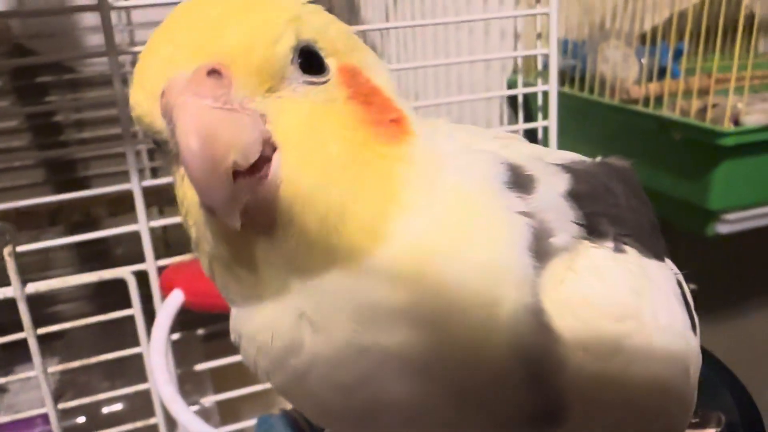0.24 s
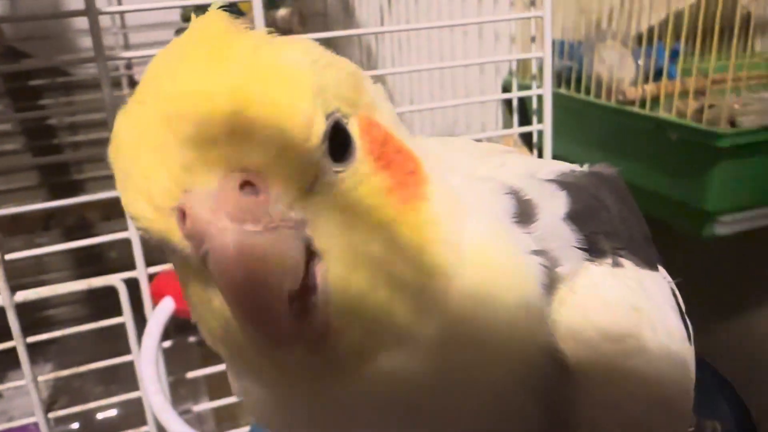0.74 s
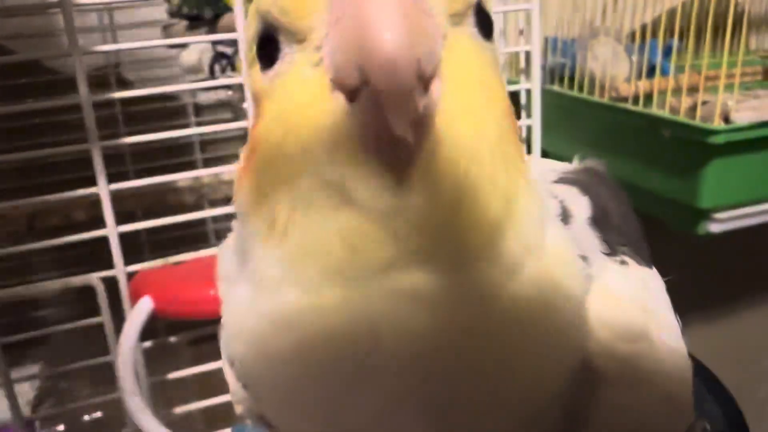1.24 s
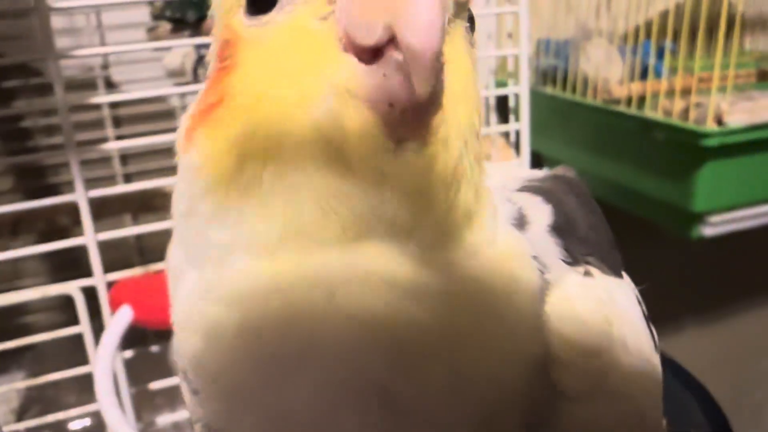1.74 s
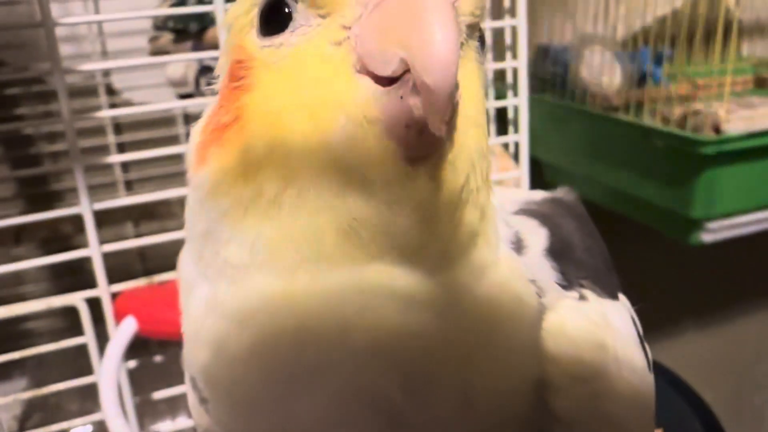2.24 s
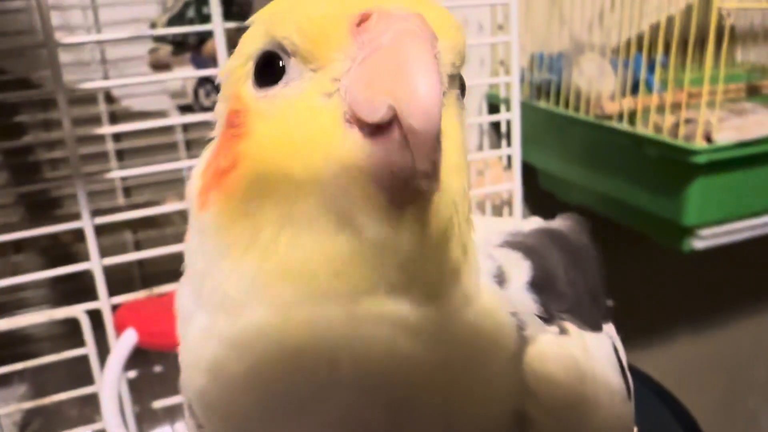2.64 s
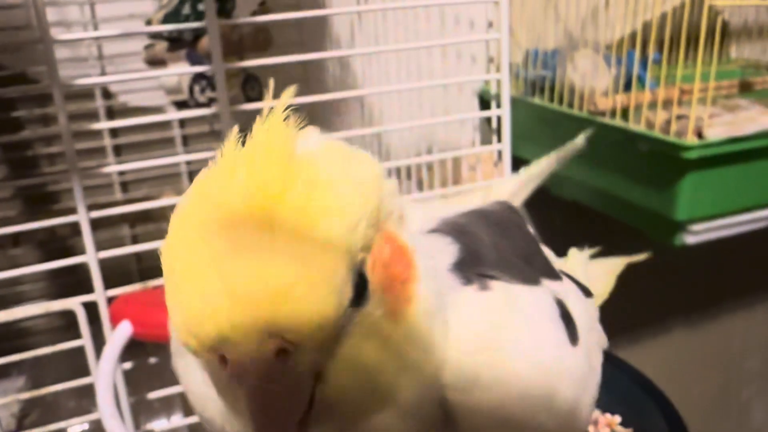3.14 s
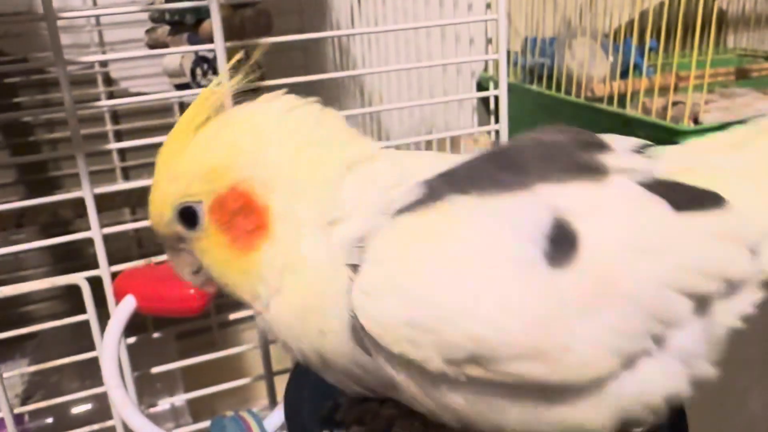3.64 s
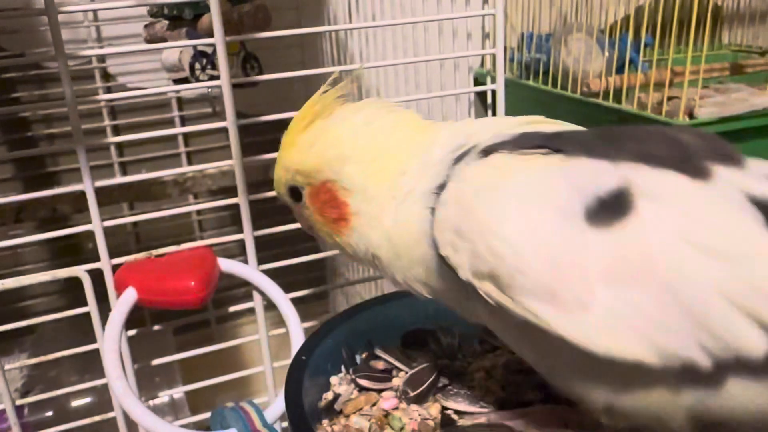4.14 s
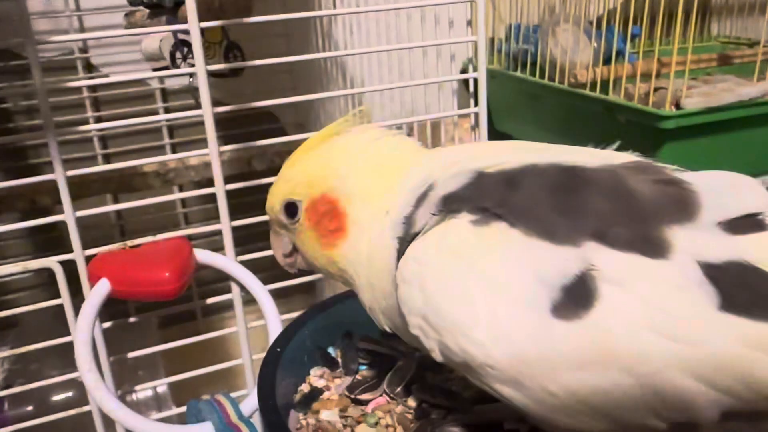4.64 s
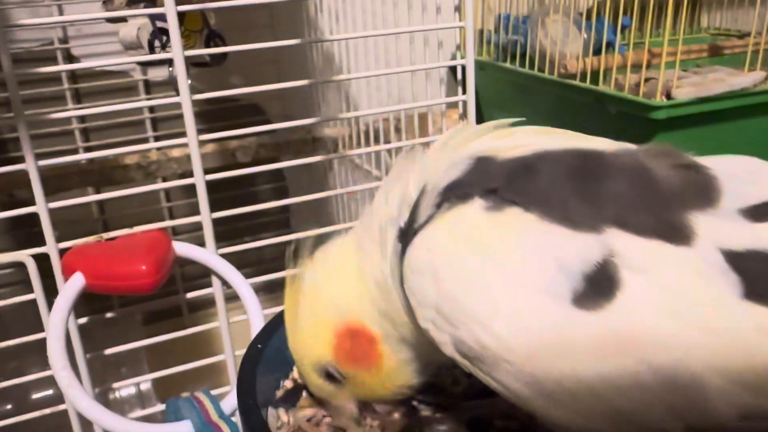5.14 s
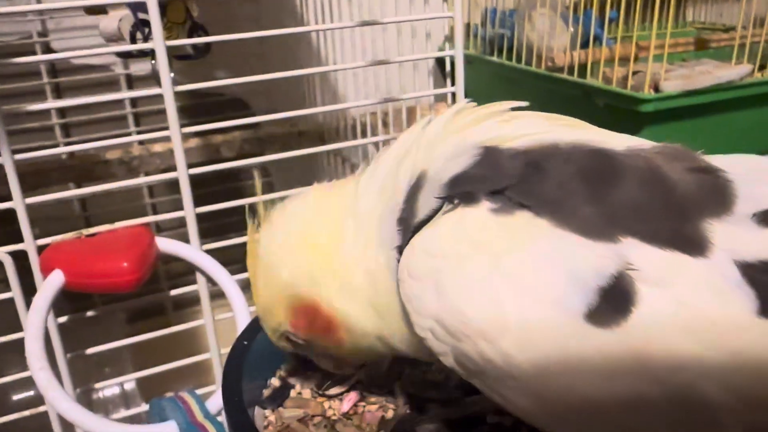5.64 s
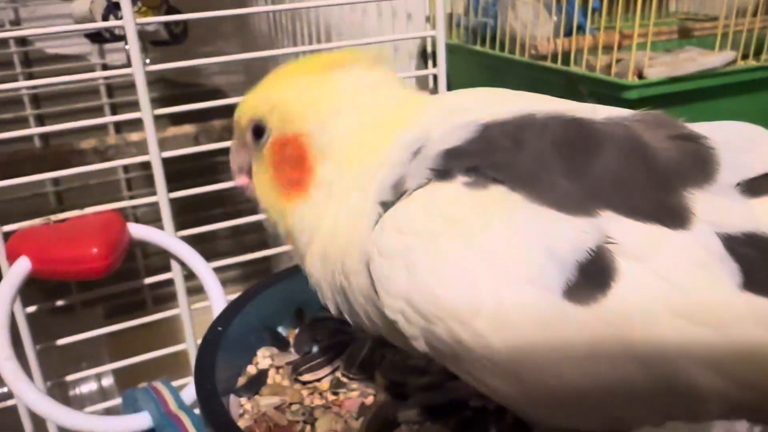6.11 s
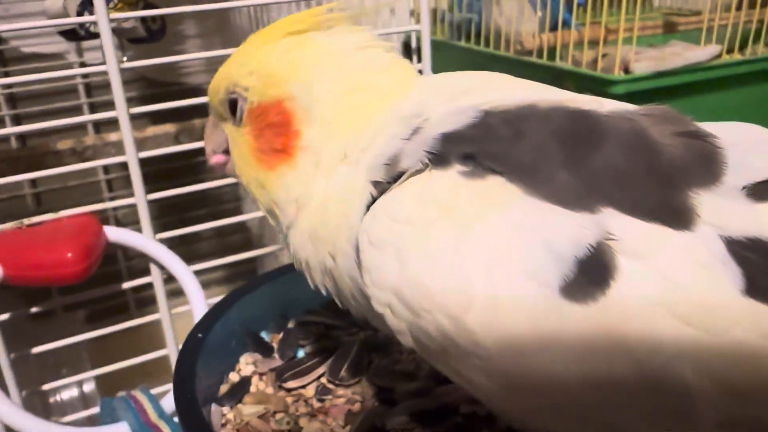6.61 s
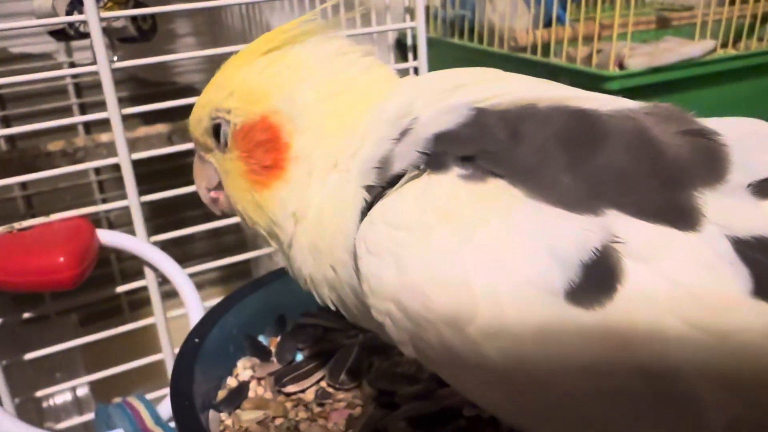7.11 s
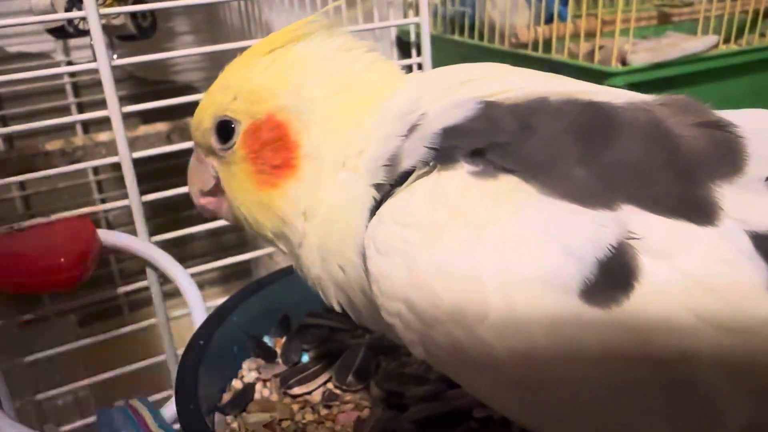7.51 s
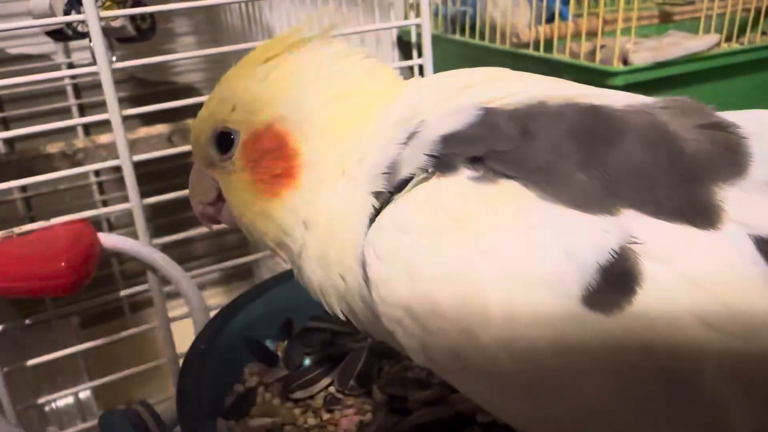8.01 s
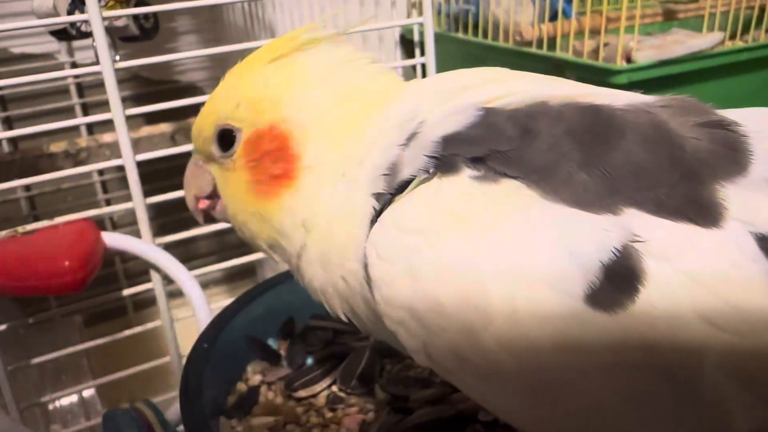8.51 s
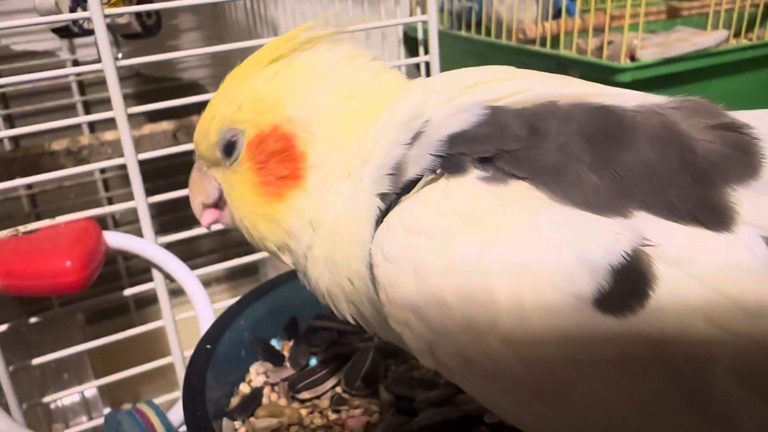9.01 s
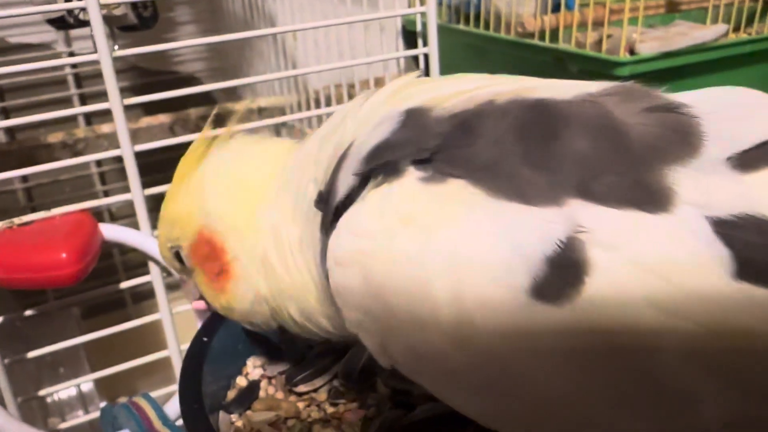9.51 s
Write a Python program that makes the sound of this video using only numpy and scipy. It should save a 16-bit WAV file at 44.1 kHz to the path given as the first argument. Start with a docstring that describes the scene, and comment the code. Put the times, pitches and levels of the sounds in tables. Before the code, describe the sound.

A cockatiel feeds at a bowl in an indoor cage: dry crackling husks and bright, tiny clicks close by. A nearby bird repeats warbling whistles that climb, flip to a high crest and drop, ringing briefly off the walls from the left. Low rumble and knocks from a hand on the microphone sit mostly near the start, with a heavy one later, over quiet room noise.

```python
"""Quiet room tone, faint hum, plumage hiss and the dull rumble of a hand on the recorder open the scene.
A cockatiel feeds at a seed bowl in a cage: the beak ticks and husks crunch, as short noise and impulse bursts.
A pet bird nearby peeps, then repeats arched, warbling chirps: gliding harmonic tones with hoarse moments.
The chirps ring round a small, live room, modelled as decaying noise reflections; knocks are swelling sines."""
import sys
import numpy as np
from scipy import signal
from scipy.fft import rfft, irfft
from scipy.io import wavfile

SR = 44100
rng = np.random.default_rng(int(sys.argv[2]) if len(sys.argv) > 2 else 0)


def digitize_waveform(pressure):
    """Quantize a signal to 16-bit integers and store it at the path in sys.argv[1].

    Rows of a 2-D input are taken as channels; values are limited to [-1, 1].
    """
    field = np.atleast_2d(pressure).T
    bounded = np.clip(field, -1, 1)
    quanta = np.round(bounded * 32767).astype(np.int16)
    wavfile.write(sys.argv[1], SR, quanta)


N = 430416
TIME = np.arange(N) / SR

# How the calling bird faces and strains. Each row: time in seconds, straight-path sound against the
# room in dB, hoarseness 0-1.
CALLER = [(1.7, -22, 0.35), (2.55, -15, 0.55), (3.0, -13, 0.92), (3.25, -4, 0), (3.7, -6.5, 0.32),
          (4.15, -7.5, 0.35), (4.5, -7.5, 0), (5.5, -25, 0.62), (5.85, -11, 0.25), (6.4, -1.5, 0.34),
          (6.7, -11.5, 0.88), (7.3, -9, 0.76), (9.0, -6, 0.31)]


def from_db(db):
    """Decibels to gain."""
    return 10 ** (np.asarray(db) / 20)


def rms_one(x):
    """Scale to unit power."""
    return x / np.sqrt(np.mean(x ** 2) + 1e-20)


def along(rows, t):
    """The columns of a curve, interpolated at times t."""
    s, *columns = np.transpose(rows)
    return [np.interp(t, s, c) for c in columns]


def at_hz(points, hz):
    """Read a table on a log-frequency axis."""
    f, value = np.transpose(points)
    return np.interp(np.log(np.maximum(hz, 1)), np.log(f), value)


def band(x, low_hz, high_hz, order=2):
    """Causal band-pass."""
    high_hz = min(high_hz, SR / 2 - 500)
    return signal.sosfilt(signal.butter(order, [low_hz, high_hz], "band", fs=SR, output="sos"), x)


def flutter(count, rate_hz):
    """Random wobble round a rate; spread 1."""
    run_in = SR // 10
    return rms_one(band(rng.standard_normal(count + run_in), rate_hz / 2, rate_hz * 2)[run_in:])


def add(track, s, sound):
    """Mix a sound in at time s."""
    i = max(round(s * SR), 0)
    track[i:i + len(sound)] += sound[:N - i]


def stereo_noise(spectrum):
    """Coloured noise whose left-right likeness depends on frequency; rms 1."""
    # Each row: frequency in Hz, left-right likeness 0-1.
    likeness = [(50, 1), (250, 0.21), (600, 0.25), (1500, 0.26), (8000, 0), (15000, 1)]
    hz = np.arange(N // 2 + 1) * SR / N
    mid, side = rfft(rng.standard_normal((2, N))) * from_db(at_hz(spectrum, hz))
    alike = np.clip(at_hz(likeness, hz), -1, 1)
    return rms_one(irfft(np.sqrt(1 + alike) * mid + np.sqrt(1 - alike) * side * [[1], [-1]], N))


def room(x, gap_s=0.0013, build_s=0.0007):
    """Dense wall reflections, different at each ear, decaying at a rate set per band."""
    # Reverberation time. Each row: frequency in Hz, time to fall 60 dB in seconds.
    t60_s = [(500, 0.9), (2500, 0.34), (5000, 0.37), (9000, 0.21), (16000, 0.024)]
    t = np.arange(SR // 2) / SR
    edges_hz = np.geomspace(300, 19000, 8)
    echoes = np.zeros((2, len(t)))
    for low_hz, high_hz in zip(edges_hz, edges_hz[1:]):
        decay_db = -60 * t / at_hz(t60_s, np.sqrt(low_hz * high_hz))
        echoes += band(rng.standard_normal((2, len(t))), low_hz, high_hz) * from_db(decay_db)
    echoes *= np.clip((t - gap_s) / build_s, 0, 1)
    gain = np.sqrt(np.mean(np.abs(rfft(echoes)[:, 1000:2500]) ** 2))   # 2-5 kHz: bins are 2 Hz wide
    return signal.fftconvolve(x[None], echoes / gain, axes=1)[:, :N]


def leftward(pair, left_db, low_hz=1900, high_hz=6500):
    """A source on the left is louder there, mostly in the presence range."""
    presence = band(pair, low_hz, high_hz, order=1)
    return pair + presence * (from_db([[left_db], [-left_db]]) - 1)


def room_tone():
    """Quiet stereo background noise of slowly changing level."""
    # Spectrum. Each row: frequency in Hz, relative level in dB.
    tone_spectrum = [(25, -26), (60, -9), (110, -10), (200, 0), (380, -4), (730, -11), (1120, -17),
                     (1810, -21), (4240, -31), (8000, -35), (9700, -36), (11500, -45), (16000, -48)]
    # Each row: time in seconds, level in dB.
    tone_level = [(0, -43), (2.2, -44), (3.3, -47), (5.2, -49), (7, -45), (8.1, -45), (9, -46.5),
                  (9.7, -44)]
    return from_db(along(tone_level, TIME)[0]) * stereo_noise(tone_spectrum)


def hum(wander_hz=1.5):
    """Faint, slightly unsteady appliance tones, as narrow bands of noise."""
    # Each row: frequency in Hz, level in dB.
    hum_tones = [(207, -65.5), (402, -61.5)]
    out = np.zeros(N)
    for hz, db in hum_tones:
        tone = band(rng.standard_normal(N), hz - wander_hz, hz + wander_hz, order=1)
        out += from_db(db) * rms_one(tone)
    return out


def feathers(flicker_db=3.0, flicker_hz=7):
    """Soft uneven hiss of plumage as the bird moves its head, close to the microphone."""
    # Each row: time in seconds, level in dB before flicker.
    rustle = [(0, -60.5), (.8, -55.5), (1.1, -56.5), (1.6, -55), (2.3, -59.5), (3.0, -59), (4.0, -75),
              (9.7, -87)]
    # Spectrum. Each row: frequency in Hz, relative level in dB.
    plumage_spectrum = [(500, -21.5), (2000, 4), (7000, 3.5), (10000, -0.5), (12000, -9), (16000, -3.5)]
    level_db = along(rustle, TIME)[0] + flicker_db * flutter(N, flicker_hz)
    return from_db(level_db) * stereo_noise(plumage_spectrum)


def handling(rumble_db=-2.0, rubbing_db=1.5):
    """The grip shifts: deep rumble, rubbing when it slips, and knocks that swell and die in a few cycles."""
    # Grip shifts. Each row: start in seconds, length in seconds, relative deep rumble in dB,
    # relative rubbing in dB.
    grips = [(0.027, 0.79, -40, -60), (0.813, .06, -35, -38.5), (0.892, 0.051, -18.5, -26.5),
             (0.974, 0.36, -35, -49.5), (1.406, .13, -17, -26.5), (1.583, 0.04, -18, -28),
             (1.692, 0.12, -23, -23.5), (1.908, 0.022, -29.5, -40.5), (2.473, 0.065, -28, -27.5),
             (2.57, .2, -36, -46.5), (3.55, 0.87, -61, -79.5), (4.21, 0.7, -44.5, -60.5),
             (5.036, 0.12, -35.5, -55.5), (5.25, 2.8, -57, -79.5), (7.082, .33, -42.5, -57),
             (7.442, 0.053, -20, -29), (7.528, 0.25, -28, -54), (7.859, 0.058, -18.5, -29.5),
             (8.75, 0.71, -59.5, -72), (9.493, .26, -49.5, -69)]
    # Knocks on the recorder body. Each row: start in seconds, sine peak in dB, pitch in Hz,
    # swell time in seconds, scuff against the sine in dB.
    knock_rows = [(0.905, -16, 85, 0.008, -35), (1.459, -20, 363, 0.0036, -32),
                  (1.707, -12, 290, 0.0038, -17), (1.744, -9.5, 278, 0.0036, -5.5),
                  (7.453, -4, 260, 0.0029, -26), (7.85, -14.5, 73, 0.014, -39),
                  (7.886, -20.5, 170.3, 0.0068, -36)]
    # Spectra. Each row: frequency in Hz, relative level in dB.
    rumble_spectrum = [(15, -14), (30, -29), (45, 4), (75, -1.5), (120, -8.5), (200, -26.5), (400, -63),
                       (1000, -100)]
    rubbing_spectrum = [(40, -31), (90, 8.5), (150, 6), (260, -1), (400, -7), (700, -23), (1400, -36),
                        (4000, -75)]
    attack_s, release_s = 0.014, 0.026   # time constants of each shift
    deep, rub, knocks = np.zeros(N), np.zeros(N), np.zeros(N)
    for s, length_s, deep_db, rub_db in grips:
        outside = np.maximum((s - TIME) / attack_s, (TIME - s - length_s) / release_s)
        pressure = np.exp(-np.clip(outside, 0, 20))
        deep = np.maximum(deep, pressure * from_db(deep_db + rumble_db))
        rub = np.maximum(rub, pressure * from_db(rub_db))
    t = np.arange(SR // 5) / SR
    for s, peak_db, hz, swell_s, scuff_db in knock_rows:
        scuff = band(band(rng.standard_normal(len(t)), 487, 522, order=1), 440, 2700)
        envelope = (t / swell_s * np.exp(1 - t / swell_s)) ** 2
        body = np.sin(2 * np.pi * hz * t) + from_db(scuff_db) * rms_one(scuff)
        add(knocks, s, from_db(peak_db) * envelope * body)
    rubbing = from_db(rubbing_db) * rub * stereo_noise(rubbing_spectrum)
    return deep * stereo_noise(rumble_spectrum) + rubbing + knocks


def beak_ticks(decay_s=0.0011, room_db=4.5, nibbles_per_s=4, nibble_db=-51):
    """Sharp bright contacts of beak on seed, with faint nibbles at random times among them."""
    # Each row: start in seconds, dry peak in dB.
    ticks = [(3.8024, -34), (4.6855, -22.5), (4.79, -31), (5.0946, -37), (6.3776, -44), (6.576, -30.5),
             (8.1782, -27), (8.4427, -29.5)]
    out, t = np.zeros(N), np.arange(SR // 100) / SR
    draws = rng.random((int(nibbles_per_s * N / SR), 2))
    nibbles = [(u * N / SR, nibble_db - 10 * v) for u, v in draws]
    for s, peak_db in list(ticks) + nibbles:
        tick = band(rng.standard_normal(len(t)) * np.exp(-t / decay_s), 3500, 17000, order=1)
        add(out, s, from_db(peak_db) * tick / np.abs(tick).max())
    return out + from_db(room_db) * room(out)


def peep(s, length_s, start_hz, end_hz, level_db, overtones_db):
    """A straight glide at an even level, as (s, pitch Hz, fundamental dB, overtones dB)."""
    return [(s, start_hz, level_db, overtones_db), (s + length_s, end_hz, level_db, overtones_db)]


def arched_call(s, climb_s, crest_s, fall_s, start_hz, flip_hz, top_hz, end_hz,
                climb_db, crest_db, overtones_db, crest_overtones_db):
    """Climb, register flip to a crest, and fall, as (s, pitch Hz, fundamental dB, overtones dB)."""
    flip_s = .006         # time to change register
    sag_per_s = .85       # share by which the crest's ends lie under its top, per s of crest
    swell_s, swell_db = .04, 5       # the whistle swells at the start
    bite_s, bite_db = 0.027, 17      # the overtones come in sooner
    mellow_db = 6.5                  # overtones fade during the climb
    full_voice_hz, weak_db_per_hz = 2200, .019   # weaker the further under this pitch
    # the fall starts a little under the flip pitch and is softer than the climb
    fall_pitch, fall_db, fall_overtones_db = .95, 5, 9.5

    def whistle_db(hz):
        """The whistle weakens below full-voice pitch."""
        return climb_db - weak_db_per_hz * np.maximum(full_voice_hz - hz, 0)

    u = np.linspace(0, 1, 20)
    rising_hz = start_hz + (flip_hz - start_hz) * u
    arch_hz = top_hz * (1 - sag_per_s * crest_s * (2 * u - 1) ** 2)
    falling_hz = fall_pitch * flip_hz * (1 - u) + end_hz * u
    rising_db = whistle_db(rising_hz) - swell_db * np.maximum(1 - u * climb_s / swell_s, 0)
    biting_db = overtones_db - bite_db * np.maximum(1 - u * climb_s / bite_s, 0) - mellow_db * u
    climb = [s + climb_s * u, rising_hz, rising_db, biting_db]
    crest = [s + climb_s + flip_s + (crest_s - 2 * flip_s) * u, arch_hz,
             np.full_like(u, crest_db), np.full_like(u, crest_overtones_db)]
    fall = [s + climb_s + crest_s + fall_s * u, falling_hz,
            whistle_db(falling_hz) - fall_db, np.full_like(u, overtones_db - fall_overtones_db)]
    return np.hstack([climb, crest, fall]).T


def chirp(rows, treble_db, uneven_db=3.5, uneven_hz=25, attack_s=.008, release_s=0.015,
          warble_hz=56, rasp_hz=200, shimmer_db=2.5, crest_hz=3100, crest_calm=0.64,
          wheeze_db=-6.0, second_hz=2400, second_db=-9.5, sheen_db=-26.5):
    """The syrinx follows a pitch curve, warbling at low pitch and steadying at the crest."""
    # Overtones above the octave. Each row: frequency in Hz, relative strength in dB.
    throat_points = [(4000, -9), (5800, -8.5), (7500, -18), (9800, -18), (11500, -30.5), (13500, -31),
                     (16000, -26.5)]

    def throat_db(f):
        """Throat colour, with this call's own brightness coming in from 10 to 12 kHz."""
        return at_hz(throat_points, f) + treble_db * np.clip((f - 10000) / 2000, 0, 1)

    t = np.arange(rows[0][0] - attack_s, rows[-1][0] + release_s, 1 / SR)
    count = len(t)
    hz, fundamental_db, overtones_db = along(rows, t)
    hoarse = np.clip(along(CALLER, t)[1], 0, 1)
    high = np.clip((hz - crest_hz) / 400 + 1, 0, 1)
    calm = crest_calm * high
    # the warble is a chain of small, uneven arches
    arch_rate_hz = warble_hz * (1 + .25 * flutter(count, 30))
    arches = np.abs(np.sin(np.pi * np.cumsum(arch_rate_hz) / SR)) - 2 / np.pi
    warble = .075 * arches + .011 * flutter(count, 35)
    # hoarse catches only pull the pitch down, so the top edge of the call stays clean
    catches = .14 * hoarse ** 2 * np.maximum(flutter(count, rasp_hz) - .7, 0)
    hz = hz * (1 + (1 - calm) * warble - catches)
    phase = 2 * np.pi * np.cumsum(hz) / SR
    upper = np.zeros(count)
    for k in range(3, 9):
        strength = from_db(throat_db(k * hz) + uneven_db * flutter(count, uneven_hz))
        upper += strength * (k * hz < SR / 2) * np.sin(k * phase)
    # a strained crest splits off a second, lower and wobblier tone
    second_phase = 2 * np.pi * np.cumsum(second_hz * (1 + .08 * flutter(count, 90))) / SR
    second = from_db(second_db) * hoarse * high * np.sin(second_phase)
    # turbulence roughens the overtones of a hoarse call
    air = band(rng.standard_normal(count), 4200, 20000)
    wheeze = rms_one(irfft(rfft(air) * from_db(throat_db(np.fft.rfftfreq(count, 1 / SR))), count))
    overtones = np.sin(2 * phase) + upper + from_db(wheeze_db) * hoarse * wheeze
    voice = from_db(fundamental_db) * (np.sin(phase) + second) + from_db(overtones_db) * overtones
    # the highest harmonics follow the strength of the whistle itself
    harmonics = sum((k * hz < SR / 2) * np.sin(k * phase) for k in range(4, 9))
    sheen = band(harmonics, 12500, 16500)
    voice = voice + from_db(fundamental_db + sheen_db + treble_db) * sheen
    gate = np.clip(np.minimum((t - t[0]) / attack_s, (t[-1] - t) / release_s), 0, 1)
    shimmer = shimmer_db * (1 - calm * (1.5 - hoarse)) * flutter(count, warble_hz)
    return t[0], np.sqrt(2) * voice * gate * from_db(shimmer)


def calling_bird(left_db=8.5, room_left_db=1.0, focus_hz=3130, focus_width_hz=220, focus_db=-1.5):
    """Calls arrive mostly by the walls, and straight from the left when the bird faces this way."""
    # Soft peeps. Each row: start in seconds, length in seconds, start pitch in Hz, end pitch in Hz,
    # relative level in dB, relative overtones in dB.
    peeps = [(0.443, 0.038, 2195, 1770, -52.5, -72), (5.045, 0.16, 1392, 1366, -59, -65),
             (5.25, .06, 1408, 1544, -58.5, -61), (6.311, 0.036, 2200, 1800, -50.5, -71),
             (6.367, 0.04, 1790, 3080, -50.5, -77), (7.442, .055, 1548, 2127, -48, -47),
             (7.511, 0.025, 2950, 2590, -40, -45.5), (8.144, 0.053, 1592, 1440, -51, -53),
             (8.197, 0.054, 1640, 2005, -47.5, -61), (8.277, 0.0056, 3386, 2930, -39, -54),
             (8.301, .014, 3320, 2390, -39, -54), (8.924, 0.023, 1360, 1550, -51, -52),
             (8.968, .07, 1496, 1728, -49.5, -59), (9.075, 0.042, 1627, 1650, -51, -55.5),
             (9.171, 0.023, 2400, 3190, -42.5, -37.5)]
    # Arched chirps; pitches before warble. Each row: start in seconds, climb in seconds, crest in
    # seconds, fall in seconds, start pitch in Hz, flip pitch in Hz, top pitch in Hz, end pitch in Hz,
    # relative levels in dB of climb, crest, climb overtones and crest overtones, top treble in dB.
    chirps = [(1.61, 0.085, 0.15, 0.036, 1604, 2546, 3418, 2450, -24, -21.5, -36.5, -51, 0.5),
              (2.405, 0.11, 0.069, 0.055, 1660, 2702, 3320, 2025, -20, -24.5, -30.5, -41, -13),
              (2.81, 0.072, 0.18, 0.0051, 1635, 2507, 3577, 2380, -19.5, -23, -28, -31.5, 4),
              (3.189, 0.11, 0.061, 0.059, 1910, 2774, 3210, 2254, -21, -19.5, -19.5, -38.5, 0),
              (3.55, 0.099, 0.064, 0.064, 1755, 2780, 3163, 2192, -22.5, -17.5, -21, -40, 4),
              (4.00, 0.13, 0.061, 0.067, 1658, 2472, 2930, 2087, -22, -20, -24, -39, 6),
              (4.39, .120, 0.092, 0.041, 1773, 2323, 2680, 1857, -25.5, -27.5, -24.5, -33.5, -6),
              (5.324, 0.12, .066, .046, 1693, 2910, 3304, 2237, -27, -22.5, -36.5, -44, 4),
              (5.71, 0.099, 0.081, 0.03, 1518, 2054, 2330, 1900, -20.5, -20, -32, -36, -25),
              (6.589, 0.061, 0.17, 0.018, 1600, 2442, 3452, 2394, -27.5, -26.5, -41, -43, -1),
              (7.10, 0.084, 0.14, 0.01, 1653, 2550, 3396, 2390, -28, -24.3, -36, -48, -3)]
    voice = np.zeros(N)
    for row in peeps:
        add(voice, *chirp(peep(*row), 0))
    for *shape, treble_db in chirps:
        add(voice, *chirp(arched_call(*shape), treble_db))
    straight = from_db(along(CALLER, TIME)[0])
    voice = voice / np.sqrt(1 + straight ** 2)   # direct and room shares keep the total power
    direct = voice * straight
    # near reflections reinforce one narrow band at the left ear, so a crest on that pitch leaps out
    focus = band(direct, focus_hz - focus_width_hz / 2, focus_hz + focus_width_hz / 2, order=1)
    direct_pair = np.array([direct + from_db(focus_db) * focus, direct])
    return leftward(direct_pair, left_db) + leftward(room(voice), room_left_db)


def crunches(snaps_per_s=2000, spread_db=3.0, width=1.33, broad_db=-3.5, ring_width_hz=400,
             dry_db=-5.0, left_db=2.5):
    """A husk gives way in a burst of tiny fractures; each husk rings at a few pitches of its own."""
    # Each row: start in seconds, fracture time in seconds, relative level in dB, centre in Hz.
    husks = [(1.242, 0.038, -49.5, 1870), (2.251, 0.025, -51.5, 7400), (2.305, 0.011, -42.5, 2850),
             (2.729, 0.0091, -43, 4400), (3.102, 0.029, -28, 5000), (3.121, 0.023, -23, 5500),
             (5.26, 0.018, -53.5, 3200), (6.003, 0.025, -28.5, 5200), (6.027, 0.01, -20.5, 5280),
             (6.506, 0.013, -49, 4430), (6.519, 0.023, -38.5, 4440), (7.056, 0.027, -53.5, 6500),
             (7.587, 0.015, -40.5, 2380), (7.986, 0.012, -48.5, 2840), (8.013, 0.013, -39, 2980),
             (8.452, 0.03, -50, 6150), (8.765, 0.031, -46, 2770), (8.784, 0.016, -41, 3230),
             (9.165, 0.0099, -36, 3220), (9.171, 0.025, -43, 5600), (9.662, 0.024, -43, 2900),
             (9.701, 0.021, -50, 2900)]
    out = np.zeros(N)
    for s, length_s, level_db, centre_hz in husks:
        count = int(length_s * SR)
        snaps = (rng.random(count) < snaps_per_s / SR) * rng.choice([-1, 1], count)
        snaps = snaps * from_db(spread_db * rng.standard_normal(count))
        snaps = np.pad(snaps, (0, count))   # time to ring out
        hump = band(snaps, centre_hz / width, centre_hz * width)
        crackle = band(band(snaps, 1200, centre_hz * 0.79, order=1), 1650, 20000)
        octaves = np.linspace(-.45, .25, 4) + rng.uniform(-.1, .1, 4)
        rings = sum(band(snaps, hz, hz + ring_width_hz, order=1) for hz in centre_hz * 2 ** octaves)
        crunch = rms_one(hump) + from_db(broad_db) * rms_one(crackle) + .5 * rms_one(rings)
        add(out, s, from_db(level_db) * rms_one(crunch))
    return leftward(room(out) + from_db(dry_db) * out, left_db)


def scene():
    """Room tone, hum, plumage, handling, feeding and calls together."""
    background = room_tone() + hum() + feathers()
    return background + handling() + beak_ticks() + calling_bird() + crunches()


def record(dry):
    """The recorder drops the deepest bass and cuts the top steeply."""
    x = signal.sosfilt(signal.butter(2, 25, "high", fs=SR, output="sos"), dry)
    cutoff_hz, ripple_db, stop_db = 15900, .1, 80
    return signal.sosfilt(signal.ellip(10, ripple_db, stop_db, cutoff_hz, fs=SR, output="sos"), x)


dry = scene()
out = record(dry)
digitize_waveform(out)
```